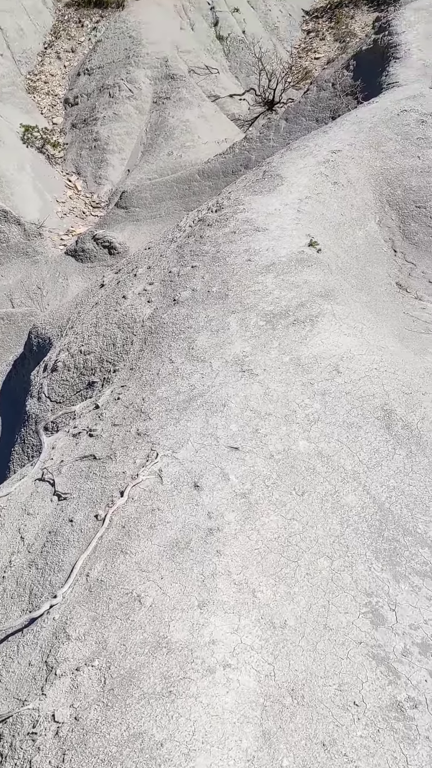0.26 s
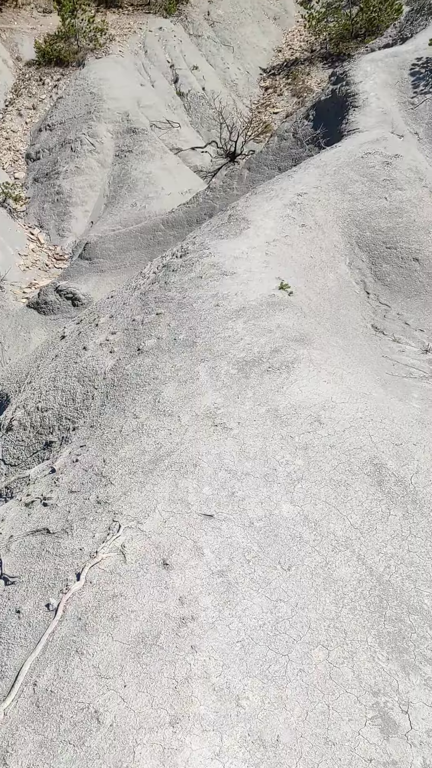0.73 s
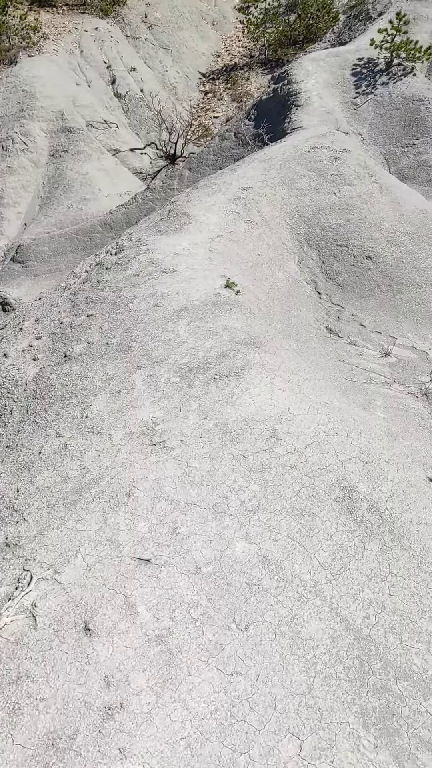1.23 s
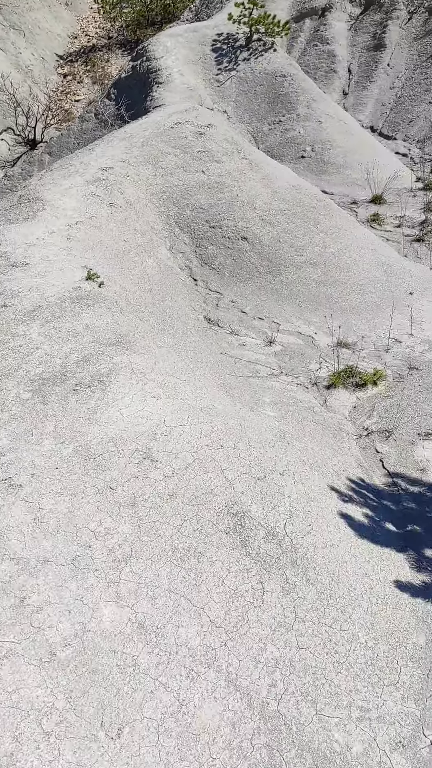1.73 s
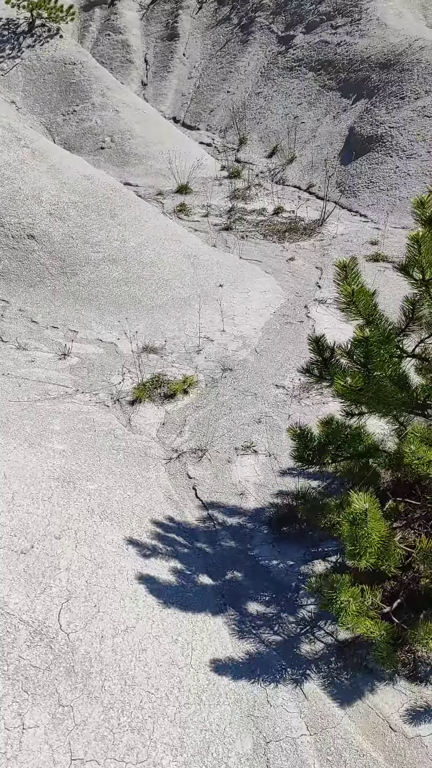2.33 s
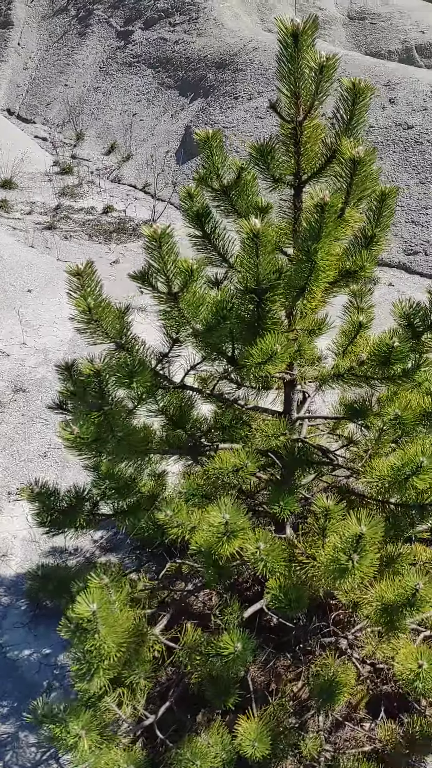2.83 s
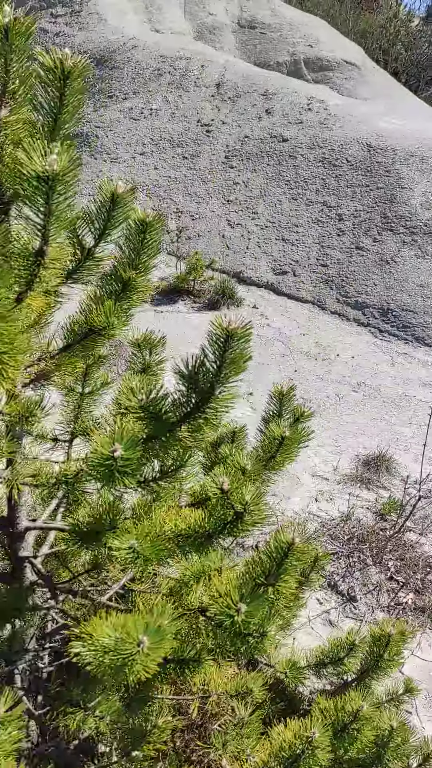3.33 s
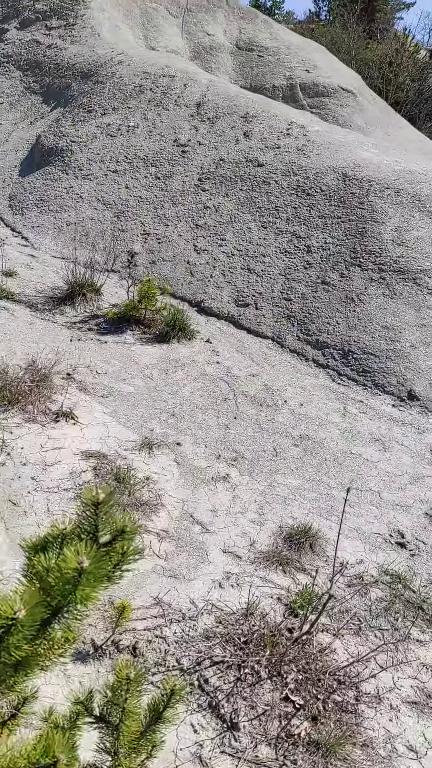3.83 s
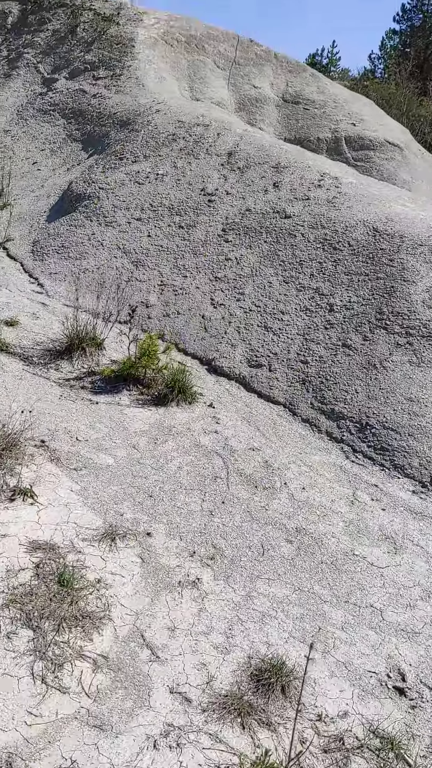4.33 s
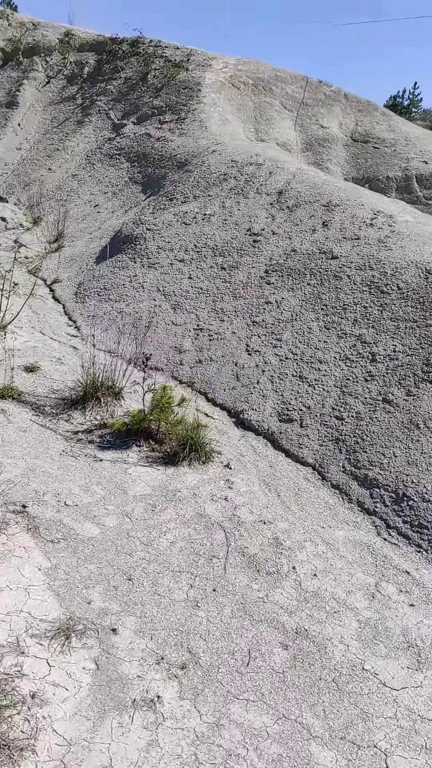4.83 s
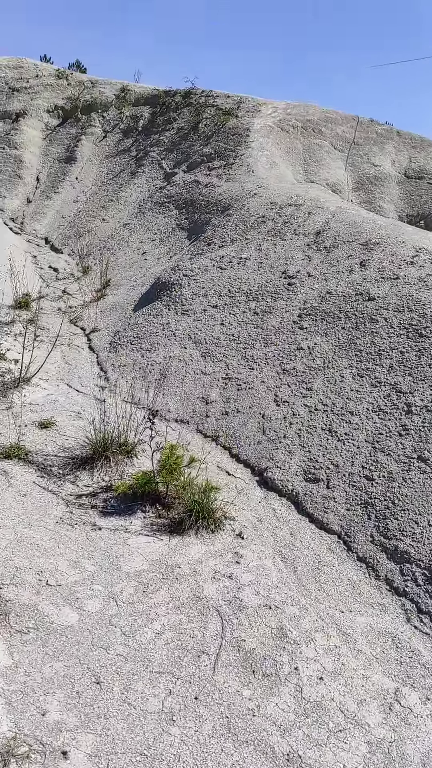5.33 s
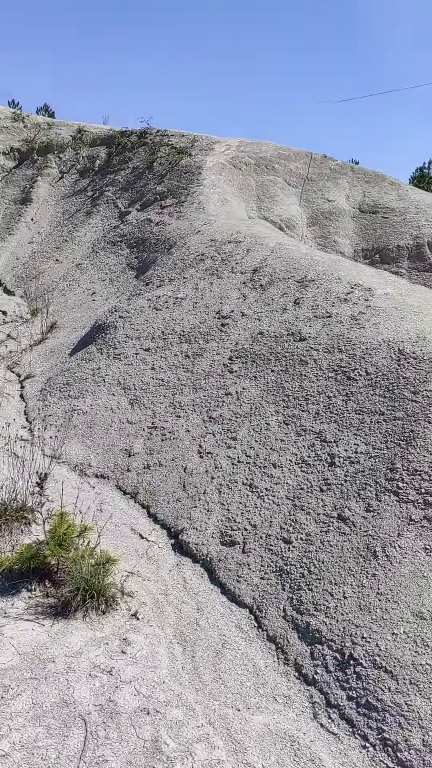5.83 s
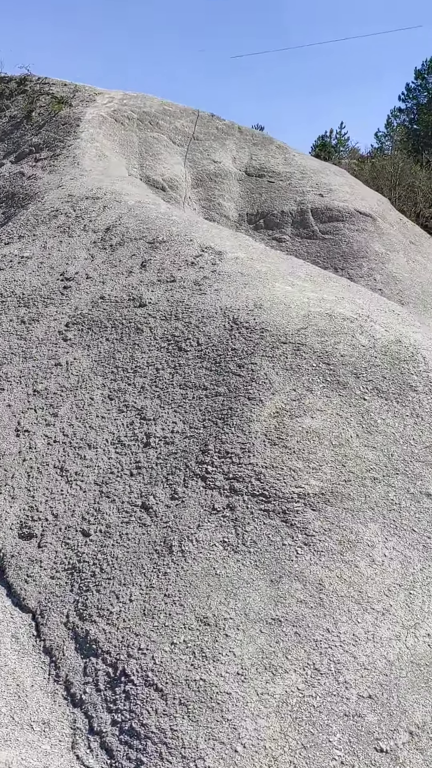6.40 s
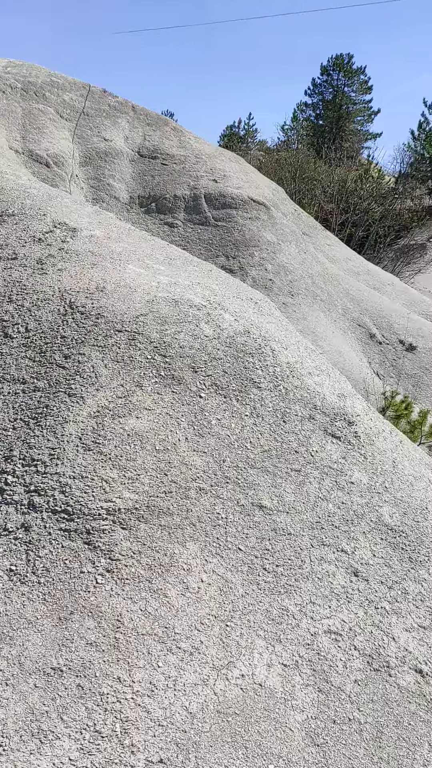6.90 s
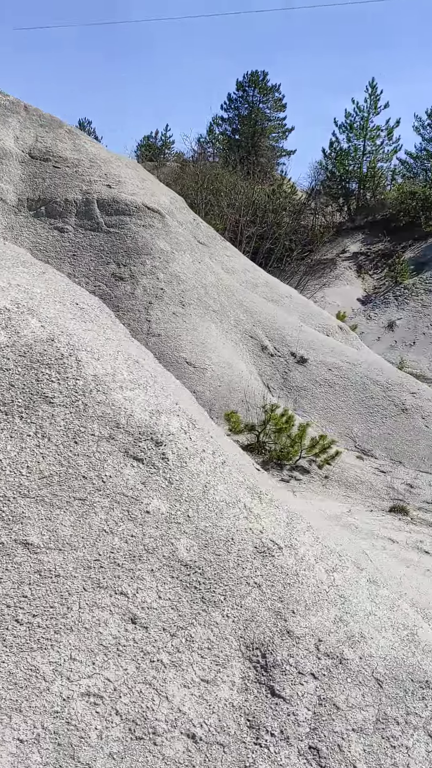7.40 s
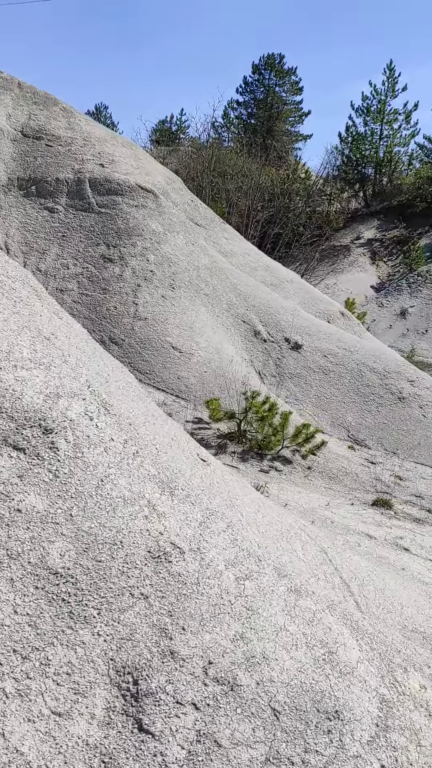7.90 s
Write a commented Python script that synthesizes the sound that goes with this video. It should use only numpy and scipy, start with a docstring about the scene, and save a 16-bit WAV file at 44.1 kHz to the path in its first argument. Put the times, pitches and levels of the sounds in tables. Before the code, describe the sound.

Slow footsteps crunch and snap over dry, brittle clay while gusts thump the microphone and small birds whistle faintly in the distance.

```python
"""Footsteps on cracked clay in gusty wind

Someone walks over a dry, eroded hillside: random fractures and ringing grains make the crunch, short damped
partials the snapping flakes, falling low tones the thumps. Shaped noise makes the gusts that buffet two
microphone ports, mostly the left one. Two songbirds, gliding sine tones, whistle far off with a faint echo,
over the hush of open air, a steady coloured noise."""
import sys
import numpy as np
from scipy import signal
from scipy.fft import rfft, irfft, next_fast_len
from scipy.io import wavfile
from scipy.ndimage import uniform_filter1d, map_coordinates

SR = 44100
rng = np.random.default_rng(int(sys.argv[2]) if len(sys.argv) > 2 else 0)


def unload_wav(signal):
    """Save mono or channel-first audio to the path in sys.argv[1] as 16-bit WAV at rate SR, clipped to [-1, 1]."""
    wavfile.write(
        sys.argv[1],
        SR,
        np.round(np.clip(np.atleast_2d(signal).T, -1, 1) * 32767).astype(np.int16),
    )


N = 359415
TIME = np.arange(N) / SR
TICKS = np.arange(0, N / SR, .001)  # times at which slow controls are computed (s)

# Levels in the event tables are relative; the keywords in scene() trim them.
# Footfalls, toe pushes and scuffs: start_s, bite_s (onset), roll_s (the sole rolls), crackle_db (fine),
# grind_db (coarse), toe_db (toe minus heel), swell_db (in mid-step)
STEPS = [(0.061, 0.0083, 0.19, -78, -71.5, 1, -2), (0.539, 0.0028, 0.071, -69.5, -64, -5.5, 1),
         (0.649, 0.0024, 0.085, -75, -68.5, 1, -6), (0.996, 0.0043, 0.16, -69, -70.5, -1, 4),
         (1.41, 0.0037, 0.21, -68.5, -68, -9.5, 2), (1.589, 0.0078, 0.035, -74, -65, -9, 2),
         (1.892, 0.0066, 0.1, -75, -67.5, 4.5, -2), (2.06, 0.019, 0.11, -71, -86, -9, -6),
         (2.45, 0.0063, 0.046, -67, -65.5, 6.5, -4), (2.55, 0.072, 0.12, -61.5, -67, -14, 4.5),
         (2.947, 0.0041, 0.1, -64, -63, -3, -8), (3.14, 0.025, 0.41, -82, -101, 0, 1),
         (3.33, 0.011, 0.06, -69, -99, 1.5, -5.5), (3.488, 0.002, 0.12, -62, -59, -5, -7),
         (3.68, 0.0084, 0.031, -72, -73, -3, 0), (4.032, 0.007, 0.0071, -70, -73, -5, 12),
         (4.14, 0.012, 0.092, -56.5, -60, -2.5, -5.5), (4.563, 0.0067, 0.031, -66, -71, -4.5, -2.5),
         (4.739, 0.0054, 0.1, -67, -71.5, 2, 5), (5.439, 0.0068, 0.14, -64, -66, -3, -1.5),
         (5.782, 0.0021, 0.18, -75.5, -79, 0.5, 4), (5.985, 0.0078, 0.032, -63, -80, -1, -5.5),
         (6.0214, 0.0069, 0.03, -48.5, -56, -11, 5.5), (6.09, 0.047, 0.14, -65.5, -65, -0.5, -2),
         (6.33, 0.021, 0.1, -69, -80, -1.5, -6.5), (6.697, 0.014, 0.037, -60.5, -53.5, -4.5, 4.5),
         (6.824, 0.0063, 0.22, -64, -69, -10, -5.5), (7.413, 0.0032, 0.079, -63.5, -64, 0, 0),
         (7.973, 0.0075, 0.02, -73, -68, -3, 0.5), (8.007, 0.005, 0.11, -61, -60.5, -1.5, -9.5)]
STEP_RELEASE_S = 0.029  # decay as the toe lets go
SETTLE_FINE_DB, SETTLE_COARSE_DB, SETTLE_S = -3.5, -24.5, 0.1  # the crushed crust settles after the foot
HEEL_DB, HEEL_S = 6, 0.032  # the weight landing on the ground, relative to the grinding; its decay


def sole_load():
    """Contact loading: the forces on fine crust, coarse crumbs and ground rise, roll heel to toe and settle."""
    fine, coarse, heel = np.zeros((3, len(TICKS)))
    for s, bite, length, fine_db, coarse_db, toe_db, swell_db in STEPS:
        roll = np.clip((TICKS - s) / length, 0, 1)
        weight = amp(toe_db * roll + swell_db * np.sin(np.pi * roll))
        press = envelope(s, length, bite, STEP_RELEASE_S)
        settle = envelope(s, length, bite, SETTLE_S)
        fine_load = np.maximum(press, amp(SETTLE_FINE_DB) * settle)
        coarse_load = np.maximum(press, amp(SETTLE_COARSE_DB) * settle)
        # overlapping steps do not add: the stronger one prevails
        fine = np.maximum(fine, amp(fine_db) * weight * fine_load)
        coarse = np.maximum(coarse, amp(coarse_db) * weight * coarse_load)
        heel += amp(coarse_db + HEEL_DB) * envelope(s, bite, bite, HEEL_S)
    return per_sample(fine), per_sample(coarse), per_sample(heel)


# Spectrum of the fine fractures: frequency_hz, gain_db
CRACKLE = [(300, -9), (1200, 2), (2800, 2), (4200, -1), (6000, 2), (8500, 3.5), (16000, -8)]
# Spectrum of the coarse grinding: frequency_hz, gain_db
GRIND = [(80, 6.5), (300, 6.5), (520, 6.5), (750, -0.5), (1100, -5), (1700, -2), (2600, -5), (3600, -9),
         (7000, -9), (16000, -53)]


def footsteps(crackle_db, grind_db, tread_db, fine_fits_db, coarse_fits_db):
    """Brittle fracture: crust gives way in fits of fine cracks and coarse grinding, over a dull ground."""
    fine, coarse, heel = sole_load()
    fits = per_sample(wobble(rate=140))
    cracks = fractures(rate=1100, spread_db=2.5)
    grit = grains(rate=800, pitch_hz=4390, octaves=0.687, cycles=1.1, spread_db=6.5)
    crumbs = grains(rate=480, pitch_hz=1730, octaves=0.95, cycles=1.2, spread_db=4)
    dust = rng.standard_normal(N)
    fine_texture = coloured(cracks + 0.9 * grit + 0.48 * dust, CRACKLE)
    crackle = evened(amp(fine_fits_db * fits) * fine_texture, span=0.2)
    coarse_texture = coloured(crumbs + 1.22 * cracks, GRIND)
    grind = evened(amp(coarse_fits_db * fits) * coarse_texture, span=0.055)
    ground_spectrum = [(90, -12.0), (250, -5.0), (450, 0.5), (750, -6.0), (1500, -16), (4000, -51)]
    ground = evened(coloured(rng.standard_normal(N), ground_spectrum), span=0.037)
    crust = amp(crackle_db) * fine * crackle + amp(grind_db) * coarse * grind
    return crust + amp(tread_db) * (heel + coarse) * ground


def fractures(rate, spread_db):
    """Poisson-like impulse noise: random moments, rate a second on average, a few much larger than the rest."""
    size = amp(spread_db * np.clip(rng.standard_normal(N), -3, 2.5))
    return unit((rng.random(N) < rate / SR) * size * rng.choice([-1, 1], N))


def grains(rate, pitch_hz, octaves, cycles, spread_db):
    """Damped resonance: crumbs of random size, rate a second, each ring about a cycle at their own pitch."""
    t = np.arange(256) / SR
    count = int(np.clip(rate * N / SR, 1, 40000))
    draws = rng.standard_normal((count, 2))
    start = rng.integers(0, N, count)[:, None]
    hz = np.clip(pitch_hz * 2 ** (octaves * draws[:, :1]), 300, 15000)
    size = amp(spread_db * np.clip(draws[:, 1:], -3, 2.3)) * np.sqrt(hz)
    rings = size * np.sin(2 * np.pi * hz * t) * np.exp(-hz * t / cycles)
    return unit(np.bincount((start + np.arange(len(t))).ravel(), rings.ravel(), N)[:N])


# The first crack under a heel: level relative to that step's fine crackle, clack relative to crack, pitches
HEEL_CRACK_DB, HEEL_CLACK_DB, HEEL_CRACK_HZ, HEEL_CLACK_HZ = 19, -5, 7300, 1770
SHARP_BITE_S = 0.0023  # a slower bite makes a weaker first crack


def heel_cracks():
    """Impact fracture: every footfall breaks a first flake as it lands; rows like those of SNAPS."""
    rows = []
    for s, bite, _, fine_db, *_ in STEPS:
        sharpness_db = 20 * np.log10(SHARP_BITE_S / max(bite, SHARP_BITE_S))
        crack_db = fine_db + HEEL_CRACK_DB + sharpness_db
        rows.append((s, crack_db, HEEL_CLACK_DB, HEEL_CRACK_HZ, HEEL_CLACK_HZ))
    return rows


# Flakes and clods of crust snapping: start_s, level_db (crack), clack_db (relative to level_db),
# crack_pitch_hz, clack_pitch_hz (its partials scatter around it)
SNAPS = [(0.069, -55, 2, 7150, 2060), (0.0713, -59, 12.5, 4100, 2100), (.107, -63, 7, 2960, 1800),
         (0.1372, -53, -3, 8150, 2600), (0.1769, -45.5, -2.5, 7040, 1930), (.188, -55, 5, 3600, 1900),
         (0.212, -64, -4, 3000, 1700), (0.2356, -50, -13, 7540, 1900), (0.2536, -44.5, -28, 9900, 2000),
         (0.2752, -43.5, -22, 8500, 2000), (.5537, -57, 1, 3500, 1400), (0.577, -47.5, 12.5, 4060, 1640),
         (.6066, -58, 12, 3480, 1160), (0.653, -46.5, 0, 3450, 1830), (0.752, -58.5, 13, 3000, 1730),
         (.802, -42, -26, 8400, 2000), (0.9963, -47, 0, 7100, 1500), (1.057, -49, 8, 8700, 1560),
         (1.09, -61, 3, 3770, 1560), (1.1135, -52, 6.5, 3600, 1890), (1.1217, -53, 5, 3600, 1800),
         (1.1322, -52, 6, 7500, 1900), (1.1431, -45, 3.5, 7240, 1890), (1.144, -44.5, -5, 3760, 2280),
         (1.414, -48, 6, 8400, 1850), (1.422, -55, 14, 7500, 1700), (1.473, -50, 5.5, 6000, 1480),
         (1.595, -62, 11, 3000, 1500), (1.5993, -55.5, 15.5, 3000, 1560), (1.9, -49.5, 5, 8700, 1550),
         (1.9018, -45.5, -14, 3970, 1680), (1.936, -54, 12, 3000, 900), (1.959, -48, -4, 7040, 1800),
         (1.981, -57.5, 10.5, 2980, 1120), (2.0366, -48.5, -8, 6100, 2000), (2.104, -60.5, 3.5, 3800, 1930),
         (2.182, -62, 7, 3650, 1890), (2.2566, -49, -35, 6960, 2000), (2.288, -63, 4, 3800, 1900),
         (2.451, -50, -6, 4000, 1510), (2.491, -46, 4.5, 8400, 1720), (2.5032, -55, 5, 3530, 1820),
         (2.5113, -57, 5, 3440, 1890), (2.5184, -46, -3, 8050, 2000), (2.5423, -56, -2, 3780, 1800),
         (2.591, -49, -4, 4000, 2240), (2.599, -55, 7, 4000, 1800), (2.609, -57, 16, 3000, 1530),
         (2.6314, -46, -2, 6200, 2400), (2.947, -45.5, 0.5, 4100, 1820), (2.991, -54, 6, 3500, 1900),
         (3.0226, -53, 6, 3880, 1910), (3.058, -43.5, 0.5, 2590, 1720), (3.329, -43.5, -27, 8200, 2000),
         (3.4122, -34.5, -21, 4200, 1410), (3.4157, -39, 0.5, 7850, 1500), (3.492, -37, -13, 8600, 1780),
         (3.5253, -54, 2, 3800, 2200), (3.5657, -50, 6, 3000, 1680), (3.578, -53, 8, 3600, 1860),
         (3.5885, -56, 13, 2500, 1460), (3.6434, -43.5, -1.5, 4300, 2180), (3.6403, -45, -11, 8200, 2000),
         (4.1657, -57, 6, 2980, 1900), (4.1877, -49, 1, 3800, 1900), (4.207, -59, -1, 3500, 1890),
         (4.2261, -47, -2, 7000, 2020), (4.243, -48.5, 9.5, 7650, 1720), (4.2527, -41.5, 1, 7900, 1920),
         (4.275, -52, 4, 3500, 1900), (4.3286, -57.5, 5.5, 3470, 1780), (4.5203, -48, 2.5, 2530, 1850),
         (4.7452, -58, 10, 4300, 1120), (4.785, -42, -7, 8200, 2080), (4.8082, -49, -2, 5540, 2020),
         (4.827, -51.5, 10, 3020, 1980), (4.8932, -43.5, -6, 6600, 1790), (4.9046, -58, 9, 2500, 1830),
         (5.2, -48.5, -8, 5560, 1560), (5.4185, -54, -10, 6030, 2000), (5.453, -48, -3, 4000, 2050),
         (5.4737, -48, 1, 3800, 1964), (5.481, -45, 0, 7460, 1970), (5.5245, -45.5, 2, 7400, 2020),
         (5.5426, -51, 5, 3800, 2000), (5.625, -43.5, -32, 8200, 2000), (5.644, -56, -17, 6500, 2000),
         (5.667, -37.5, -2.5, 9450, 1025), (5.783, -51.5, -7, 8000, 2000), (5.8115, -48, 6, 8650, 1900),
         (5.8778, -42, 2, 10100, 1820), (5.9096, -45, -2, 8900, 1670), (5.994, -51, 1.5, 5000, 1900),
         (6.0131, -37, -17, 8460, 2000), (6.0305, -26.5, -25, 8830, 1820), (6.049, -36.5, -25, 8800, 2000),
         (6.077, -42, -18, 7100, 2000), (6.13, -45, 7.5, 3000, 1440), (6.14, -50, 6, 3500, 1900),
         (6.1485, -50, 8, 3500, 1900), (6.158, -42.5, -9, 6050, 2380), (6.1661, -51, 10, 3000, 1910),
         (6.195, -35, -22, 2500, 2280), (6.202, -50, 3, 3500, 2100), (6.2164, -43, -1, 3000, 1800),
         (6.2267, -39.5, 3, 9100, 1880), (6.2565, -57, 15, 3000, 770), (6.283, -41.5, -31, 8800, 2000),
         (6.7073, -52, 4, 3000, 1910), (6.729, -51, 6, 3000, 1900), (6.899, -55.5, 5.5, 3500, 1890),
         (7.0407, -60, 7, 3000, 1870), (7.0504, -40, -4.5, 8870, 1720), (7.0785, -39, -8, 2500, 1780),
         (7.145, -44, -6, 2800, 1680), (7.1743, -43, -3.5, 6900, 990), (7.2475, -49.5, -16, 8460, 2000),
         (7.27, -48.5, -13, 8500, 2010), (7.2922, -42.5, -20, 3500, 2000), (7.3335, -46, -10, 2720, 2020),
         (7.421, -37, -15, 3600, 2030), (7.5008, -57, 3, 3700, 1880), (7.53, -60, 10, 3020, 1680),
         (7.556, -57.5, 9.5, 4000, 1820), (7.9397, -55.5, 2, 3540, 1900), (8.01, -38, -4.5, 8600, 1780),
         (8.016, -48, 1, 4030, 1910), (8.0613, -53, 8, 3550, 1900), (8.125, -53, 14, 3000, 1670),
         (8.1402, -50, 4, 3500, 1890)]
# Partials of a clack: interval_octaves (above its pitch), level_db
CLACK = [(-0.88, -1.5), (-0.376, -3), (-0.2, 3.5), (0.146, 1.5), (0.6, 0), (0.84, -1), (1.21, -11)]


def snaps(crack_db, ring, ring_cycles, crack_t60, clack_db, clack_cycles):
    """Modal impact: a flake cracks in a brief ringing burst and clacks in partials, the low ones longer."""
    clacks, cracks, t = np.zeros(N), np.zeros(N), np.arange(SR // 20) / SR
    octaves, partial_db = np.transpose(CLACK)
    weights = (amp(partial_db) * (-1) ** np.arange(len(CLACK)))[:, None]
    for s, db, low_db, hz, clack_hz in SNAPS + heel_cracks():
        burst = rng.standard_normal(len(t)) * amp(-60 * t / crack_t60)
        crack = burst + ring * np.sin(2 * np.pi * hz * t) * np.exp(-hz * t / ring_cycles)
        add(cracks, s, amp(db + crack_db) * crack / np.linalg.norm(crack))
        detuned = octaves + .07 * rng.standard_normal(len(CLACK))  # no two flakes alike
        pitches = clack_hz * 2 ** detuned[:, None]
        partials = weights * np.sqrt(pitches) * np.sin(2 * np.pi * pitches * t)
        clack = (partials * np.exp(-pitches * t / clack_cycles)).sum(0)
        add(clacks, s, amp(db + low_db + clack_db) * clack / np.linalg.norm(clack))
    crack_spectrum = [(500, -9), (2200, -5.5), (4200, -1.5), (6500, 2.5), (9000, -1.5), (15000, -7.5)]
    return clacks + coloured(cracks, crack_spectrum)


# Dull thumps of a heel or a sudden puff of air: start_s, level_db,
# pitch_hz (nominal: the glide runs from 1.19 towards 0.69 times it), rise_s
THUMPS = [(.999, -39, 238, 0.0013), (1.054, -26.5, 278, 0.0023), (1.898, -45.5, 430, 0.0024),
          (1.913, -40, 360, 0.00063), (1.979, -38, 360, 0.0014), (2.453, -40.5, 264, 0.00092),
          (2.4974, -49, 465, 0.0015), (2.941, -42, 90, 0.0018), (3.467, -35.5, 237, 0.0038),
          (3.497, -31.5, 195, 0.0062), (4.158, -45, 303, 0.0011), (4.241, -37.5, 264, 0.00055),
          (4.597, -24, 157, 0.0034), (6.063, -21.5, 196, 0.0047), (6.221, -15.5, 178, 0.0038),
          (6.256, -17, 286, 0.0011), (6.646, -17, 289, 0.0022), (7.175, -20.5, 342, 0.0016)]


def thumps(t60):
    """Damped oscillation: a short low push swings a few times and falls in pitch, mostly at the left port."""
    out, t = np.zeros(N), np.arange(SR // 8) / SR
    for s, db, hz, rise in THUMPS:
        phase = 2 * np.pi * np.cumsum(hz * (0.69 + .5 * np.exp(-t / 0.0075))) / SR
        swell = (1 - np.exp(-(t / rise) ** 2)) * amp(-60 * t / t60)
        add(out, s, -amp(db) * swell / swell.max() * np.sin(phase))
    return out * amp([[0], [-18]])


# Thin high squeaks: start_s, level_db (fundamental), pitch_hz (settled), fall_share (starts higher by this)
SQUEAKS = [(3.329, -64, 6240, .1), (3.866, -48, 6200, .3), (5.084, -56, 6200, .04)]


def squeaks(octave_db, t60):
    """Frequency-jittered ringing: a brief, thin, scratchy tone whose octave is the stronger part."""
    out, t = np.zeros(N), np.arange(SR // 10) / SR
    for s, db, hz, fall in SQUEAKS:
        scratch = 0.07 * rng.standard_normal(len(t))
        phase = 2 * np.pi * np.cumsum(hz * (1 + fall * np.exp(-t / 0.003) + scratch)) / SR
        swell = amp(db - 60 * t / t60) * (1 - np.exp(-t / 0.0015))
        add(out, s, swell * (np.sin(phase) + amp(octave_db) * np.sin(2 * phase)))
    return out


def trickle(level_db, clod_db):
    """Sparse random impacts: loose crumbs roll down the slope in tiny ticks, with a few larger clods."""
    ticks = fractures(rate=45, spread_db=5)
    clods = fractures(rate=12, spread_db=3)
    return amp(level_db) * unit(coloured(ticks, CRACKLE)) + amp(clod_db) * unit(coloured(clods, GRIND))


STRIDE_TURN = 2.4  # how fast the reflections change as the feet move (turns a second)


def from_below(x, far_port_db, near_scatter_db, far_scatter_db):
    """Arrival-time difference and scattering: left hears the feet first; ground and legs reflect changeably."""
    lag = .00052  # s
    right = amp(far_port_db) * filtered(x, lambda hz: np.exp(-2j * np.pi * hz * lag))
    turn = 2 * np.pi * STRIDE_TURN * TIME
    # three shares whose squares sum to 1 fade between three sets of reflections
    paths = [np.cos(turn), np.sin(turn) * np.cos(turn / np.e), np.sin(turn) * np.sin(turn / np.e)]
    reflections = sum(scattered(x * share, t60=.028) for share in paths)
    return np.array([x, right]) + amp([[near_scatter_db], [far_scatter_db]]) * reflections


# Gusts striking the ports: start_s, length_s, buffet_db (fast eddies), rumble_db (slow eddies),
# left_db (left minus right)
GUSTS = [(0, 0.066, -56.5, -44, 9), (0.145, 0.053, -56, -42, 4), (0.536, 0.2, -59.5, -53.5, 19),
         (0.987, 0.025, -54, -72, 2), (1.387, 0.11, -50, -46, 19), (1.98, 0.089, -59, -48, -14),
         (2.344, 0.12, -53.5, -45.5, 1.5), (2.633, 0.2, -56.5, -50, -28), (2.742, 0.077, -42.5, -45, -36),
         (2.915, 0.051, -38.5, -34, 33), (3.27, 0.17, -50, -44, 10), (3.437, 0.13, -49.5, -42, 29),
         (4.203, 0.044, -57, -52, 5), (4.409, 0.063, -42.5, -40, 36), (4.558, 0.13, -38, -38.5, 38),
         (4.741, 0.028, -41, -36, 31), (4.853, 0.037, -47, -39.5, 29), (5.112, 0.013, -49.5, -41.5, 43),
         (5.221, 0.099, -44, -47, 37), (5.69, 0.032, -38.5, -34.5, 35), (5.873, 0.53, -48, -43, 32),
         (6.037, 0.096, -31.5, -40, 43), (6.158, 0.1, -29.5, -35, 37), (6.324, 0.38, -43.5, -41.5, 4),
         (6.594, 0.22, -31.5, -33.5, 17), (6.885, 0.03, -34.5, -56, -4.5), (7.022, 0.08, -34.5, -59, 28),
         (7.12, 0.091, -32.5, -34, 37), (7.314, 0.047, -36, -36.5, 3), (7.448, 0.14, -47, -49, 6),
         (7.697, 0.091, -45.5, -40, -15), (7.951, 0.12, -34.5, -39, 19)]
GUST_ATTACK_S, GUST_RELEASE_S = 0.019, 0.034
RUMBLE_RELEASE_S = 0.041  # the slow eddies linger
# Slow wind level alongside the listed gusts, rising into broad gusts near 7.2 s and at the end: time_s,
# level_db
WIND_SWELL = [(0.0, -48.5), (0.36, -57), (3.45, -50.5), (3.81, -60), (4.74, -53), (4.95, -58), (5.7, -50.5),
              (6.27, -52), (6.38, -56.5), (7.19, -34.5), (7.72, -55.5), (8.15, -36)]
SWELL_LEFT_DB = 3  # left minus right
LUMPS_DB, LUMPS_PER_S = 3, 36  # the buffeting comes in lumps: spread, knots a second


def airflow(swell_buffet_db, swell_rumble_db):
    """Power addition: gusts and the slow swell set the strength of fast and slow eddies at each port."""
    swell = ports(SWELL_LEFT_DB) * amp(np.interp(TICKS, *np.transpose(WIND_SWELL)))
    fast_power = (amp(swell_buffet_db) * swell) ** 2
    slow_power = (amp(swell_rumble_db) * swell) ** 2
    for s, length, fast_db, slow_db, left_db in GUSTS:
        fast_gust = envelope(s, length, GUST_ATTACK_S, GUST_RELEASE_S)
        slow_gust = envelope(s, length, GUST_ATTACK_S, RUMBLE_RELEASE_S)
        fast_power += (ports(left_db) * amp(fast_db) * fast_gust) ** 2
        slow_power += (ports(left_db) * amp(slow_db) * slow_gust) ** 2
    fast = [per_sample(np.sqrt(port) * amp(LUMPS_DB * wobble(LUMPS_PER_S))) for port in fast_power]
    slow = [per_sample(np.sqrt(port)) for port in slow_power]
    return np.array(fast), np.array(slow)


def ports(left_db):
    """Level difference: gains of the two ports, sharing a power of 1."""
    pair = amp([[left_db / 2], [-left_db / 2]])
    return pair / np.linalg.norm(pair)


# Spectrum of the slow eddies: frequency_hz, gain_db
RUMBLE = [(8, 2), (22, 5.5), (50, 3), (85, 0.5), (130, -16.5), (250, -23.5), (600, -39), (2000, -120)]
FIRM_GUST_DB = -40.5  # the strength at which the buffeting has its nominal brightness


def wind(buffet_db, rumble_db, corner_hz, doubling_db, boom_hz, boom_q):
    """Turbulence: each port has its own eddies round one booming pitch; harder gusts make faster ones."""
    fast, slow = airflow(swell_buffet_db=-13.5, swell_rumble_db=1.0)
    hz, t, z = signal.stft(rng.standard_normal((2, N)), SR, nperseg=1024)
    force_db = np.array([np.interp(t, TIME, 20 * np.log10(port)) for port in fast])
    # the upper corner frequency doubles with every doubling_db of force
    corner = corner_hz * 2 ** ((force_db[:, None] - FIRM_GUST_DB) / doubling_db)
    hz = hz[:, None] + 1
    boom = 1 / np.sqrt(1 + (boom_q * (hz / boom_hz - boom_hz / hz)) ** 2)
    shape = boom / np.sqrt(1 + (hz / corner) ** 9)
    buffet = evened(signal.istft(z * shape, SR, nperseg=1024)[1][:, :N], span=0.0361)
    rumble = evened(coloured(rng.standard_normal((2, N)), RUMBLE), span=0.068)
    return amp(buffet_db) * fast * buffet + amp(rumble_db) * slow * rumble


# Syllables of the repeating bird, one row a note: delay_s, length_s, level_db, crescendo_db,
# then pitch_hz at evenly spaced points
HOLD = [(-.026, .016, -14, 0, 2800, 3300, 3700, 4100), (-.004, .012, -11, 0, 3600, 3300, 3100, 3000),
        (.008, .062, -5.5, 2, 4200, 3880, 3790, 3760, 3750, 3760, 3775, 3770)]
HOOK = [(.004, .017, -8, 3, 4700, 4650, 4800, 5150), (.018, .024, -1.5, 2, 3350, 3900, 4120, 4150),
        (.05, .022, -1, 4, 3750, 3500, 3250, 2950)]
ARCH = [(0, .108, 0, 7.5, 2430, 2680, 2820, 2890, 2930, 2960, 2970, 2920, 2600)]
# Its song: start_s, level_db, syllable
SONG = [(0.544, -62.5, HOOK), (0.643, -61.5, ARCH), (0.923, -54.5, HOLD), (1.202, -60.5, HOOK),
        (1.304, -61, ARCH), (3.44, -68, ARCH), (3.726, -63, HOLD), (4.014, -65.5, HOOK),
        (4.126, -58.5, ARCH), (4.415, -56.5, HOLD), (4.658, -61.5, HOOK), (4.765, -56, ARCH),
        (5.062, -53, HOLD), (5.312, -58.5, HOOK), (5.423, -58.5, ARCH)]


def repeating_bird():
    """Sequenced glides: the song strings together three syllables of pure gliding notes."""
    out = np.zeros(N)
    for s, db, syllable in SONG:
        for delay, length, note_db, crescendo_db, *pitches in syllable:
            note = whistle(length, pitches, waver=WAVER, crescendo_db=crescendo_db)
            add(out, s + delay, amp(db + note_db) * note)
    return out


# Notes of the warbling bird: start_s, length_s, level_db, trill_depth (0-1), pitch_hz at four even points
WARBLE = [(.008, 0.037, -68, 0.12, 4330, 4150, 3800, 3500), (.333, 0.025, -68, 0, 8000, 7900, 8100, 8500),
          (0.805, 0.028, -67, 0.5, 4530, 5160, 5640, 6150),
          (5.774, 0.031, -57.5, 0.23, 2900, 3560, 2760, 2520),
          (5.839, 0.027, -53, 0, 2630, 2910, 2820, 2450), (5.919, 0.035, -56, 0, 4200, 3910, 3700, 3300),
          (6.06, 0.072, -49, 0, 2990, 2990, 3084, 2860), (6.304, 0.023, -51.5, 0, 3370, 3620, 3550, 3600),
          (6.331, 0.022, -49, 0.6, 3430, 3110, 2960, 2980),
          (6.352, 0.059, -60, 0.81, 3000, 2840, 2840, 2760),
          (6.481, 0.018, -62.5, 0, 5850, 5630, 5350, 5000),
          (6.575, 0.061, -52.5, 0, 5030, 5020, 3430, 2600),
          (6.758, 0.039, -53, 0.25, 3250, 4400, 4740, 5150),
          (6.937, 0.032, -58, 0.11, 4600, 4230, 4300, 4300), (6.965, 0.032, -52, 0, 3510, 3480, 3526, 3400),
          (6.998, 0.037, -53, 0.85, 3590, 3230, 2990, 2680),
          (7.099, 0.075, -51.5, 0, 2500, 2580, 2804, 2860), (7.282, .054, -55.5, 0, 3990, 3540, 2760, 2600),
          (7.412, 0.096, -55, 0.11, 3800, 3560, 3330, 3140),
          (7.584, 0.085, -57, 0.12, 5130, 4890, 4870, 4860),
          (7.771, 0.066, -55.5, 0.099, 4650, 4050, 3700, 2980),
          (7.852, 0.097, -54.5, 0.083, 2920, 2834, 2866, 2904),
          (8.07, 0.056, -55.5, 0.38, 2720, 2820, 2590, 2570)]


def warbling_bird():
    """Amplitude and frequency modulation: single gliding notes, some of them trilled."""
    out = np.zeros(N)
    for s, length, db, trill, *pitches in WARBLE:
        add(out, s, amp(db) * whistle(length, pitches, waver=WAVER, trill=trill))
    return out


NOTE_ROUNDNESS = 0.16  # 0: a note starts and stops abruptly, 1: it swells smoothly
WAVER, FLUTTER_DB = .008, 1.5  # spread of the pitch tremble (share) and of the loudness flutter


def whistle(length, pitches, waver, trill=0, crescendo_db=0):
    """Gliding sinusoid: one pure note runs through its pitches; a trill chops it into quick falling pips."""
    u = np.linspace(0, 1, int(length * SR))
    where = u * (len(pitches) - 1)
    glide = map_coordinates(np.array(pitches, float), [where], order=2, mode="nearest")
    tremor = map_coordinates(rng.standard_normal(64), [u * length * 250], mode="nearest")
    trill_hz = 80
    beat = 2 * np.pi * trill_hz * u * length
    loudness_db = crescendo_db * (u - .5) + FLUTTER_DB * tremor + 8 * trill * (np.sin(beat) - .5)
    swell = np.abs(np.sin(np.pi * u)) ** NOTE_ROUNDNESS * amp(loudness_db)
    pitch = glide * (1 + waver * tremor + 0.11 * trill * np.cos(beat))
    return swell * np.sin(2 * np.pi * np.cumsum(pitch) / SR)


def birds(level_db, echo_db):
    """Diffuse reflection: both birds sing straight ahead, and the bare slopes answer faintly."""
    song = repeating_bird() + warbling_bird()
    return amp(level_db) * (song + amp(echo_db) * scattered(song, t60=0.28))


# Spectrum of the open air: frequency_hz, gain_db
AIR = [(30, 15), (150, 11), (300, 7.5), (550, 9.5), (800, 5), (1050, 2.5), (1400, -2.5), (2500, -3),
       (5000, -7.5), (8000, -5), (11000, -11.5), (16000, -35)]


def air(hush_db):
    """Stationary coloured noise: a steady hush, independent at each port and a little stronger on the left."""
    return amp(hush_db) * unit(coloured(rng.standard_normal((2, N)), AIR)) * amp([[1], [-1.5]])


def scattered(x, t60):
    """Exponential reverberation: diffuse reflections of energy 1, different for each port."""
    t = np.arange(int(t60 * SR) + 1) / SR
    tail = rng.standard_normal((2, len(t))) * amp(-60 * t / t60)
    tail /= np.linalg.norm(tail, axis=1, keepdims=True)
    return signal.oaconvolve(x[None], tail, axes=1)[:, :N]


def envelope(s, length, attack, release):
    """Exponential decay: rise from time s, hold until length has passed, then die away."""
    t = TICKS - s
    return np.clip(t / attack, 0, 1) * np.exp(-np.clip((t - length) / release, 0, 40))


def per_sample(control):
    """Linear interpolation: a slow control, spread from its ticks over every sample."""
    return np.interp(TIME, TICKS, control)


def wobble(rate):
    """Band-limited randomness: a smooth random curve at the ticks, rate knots a second."""
    return map_coordinates(rng.standard_normal(4000), [TICKS * rate], mode="wrap")


def amp(db):
    """Logarithmic level: decibels to gain."""
    return 10 ** (np.asarray(db) / 20)


def unit(x):
    """Normalised power: scale to rms 1."""
    return x / np.sqrt(np.mean(x ** 2) + 1e-20)


def evened(x, span):
    """Running normalisation: x held near rms 1 over stretches of span seconds."""
    power = np.abs(uniform_filter1d(x * x, max(int(span * SR), 1), axis=-1))
    return x / np.sqrt(power + 1e-12)


def add(track, s, sound):
    """Superposition: mix a short sound into a track at time s."""
    part = track[max(round(s * SR), 0):][:len(sound)]
    part += sound[:len(part)]


def filtered(x, response):
    """Linear filtering: x times a complex response of frequency."""
    m = next_fast_len(N + 8192)
    return irfft(rfft(x, m) * response(np.fft.rfftfreq(m, 1 / SR)), m)[..., :N]


def coloured(x, points):
    """Spectral shaping: x through a response of (Hz, dB) points, read on a log axis."""
    f, db = np.transpose(points)
    return filtered(x, lambda hz: amp(np.interp(np.log(hz + 1), np.log(f), db)))


def scene():
    """Superposition of sources: feet below, birds ahead, wind on the ports."""
    flakes = snaps(crack_db=13, ring=1.0, ring_cycles=5.3, crack_t60=0.0096, clack_db=13.0, clack_cycles=2.3)
    crunch = footsteps(crackle_db=4.5, grind_db=10, tread_db=-3.0, fine_fits_db=1.5, coarse_fits_db=2.8)
    crunch += squeaks(octave_db=16.0, t60=0.031)
    crunch += trickle(level_db=-80.5, clod_db=-78.5)
    feet = from_below(crunch + flakes, far_port_db=-6.0, near_scatter_db=-10, far_scatter_db=-4.0)
    gusts = wind(buffet_db=1.0, rumble_db=2.0, corner_hz=275.5, doubling_db=19.5, boom_hz=151.0, boom_q=4.3)
    outdoors = birds(level_db=-3.0, echo_db=-6.5) + air(hush_db=-70.5)
    return feet + thumps(t60=0.019) + gusts + outdoors


# Response of each microphone port: frequency_hz, gain_db
LEFT_PORT = [(6000, 0.5), (7500, 5), (8600, 12), (9250, 8.5), (10000, -2), (11000, -4), (13000, -3),
             (15800, -37)]
RIGHT_PORT = [(6000, -0.5), (7600, 5.5), (8500, -3), (9300, -16), (10300, -8.5), (14000, -16), (15800, -6)]
TOP_HZ = 15850  # band limit


def record(dry):
    """Resonance and band limiting: each port colours the treble; nothing passes above the limit."""
    heard = np.array([coloured(dry[0], LEFT_PORT), coloured(dry[1], RIGHT_PORT)])
    return filtered(heard, lambda hz: hz < TOP_HZ)


dry = scene()
out = record(dry)
unload_wav(out)
```